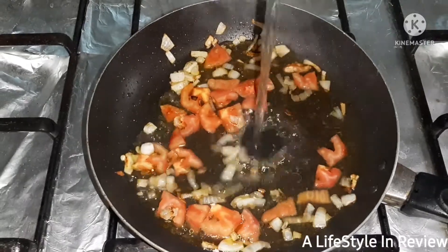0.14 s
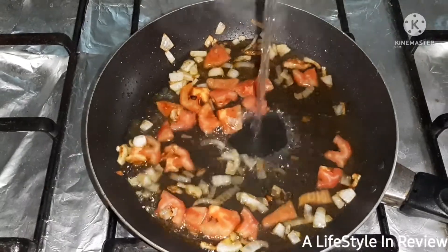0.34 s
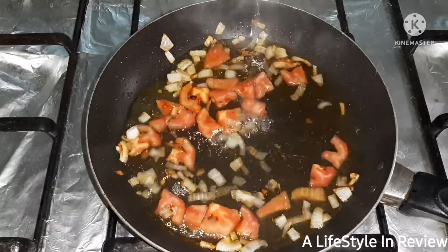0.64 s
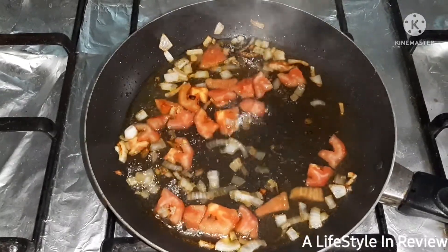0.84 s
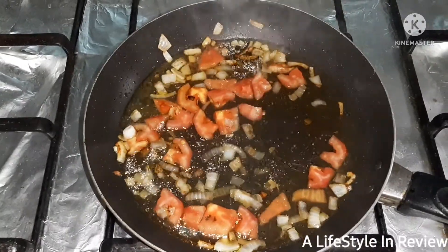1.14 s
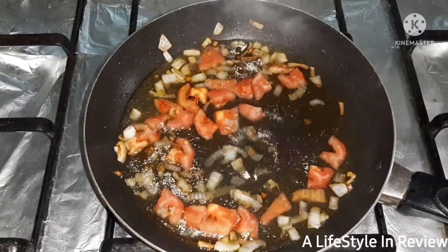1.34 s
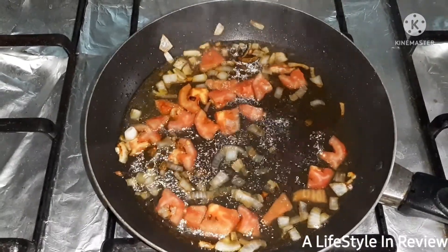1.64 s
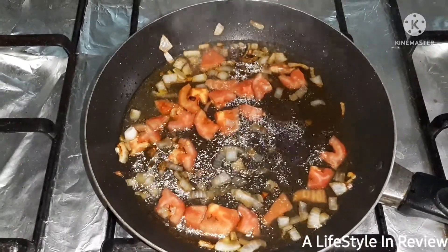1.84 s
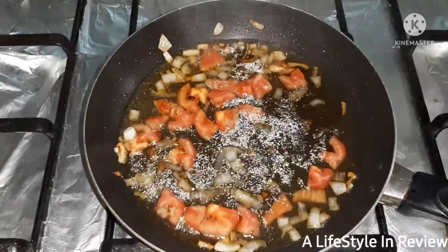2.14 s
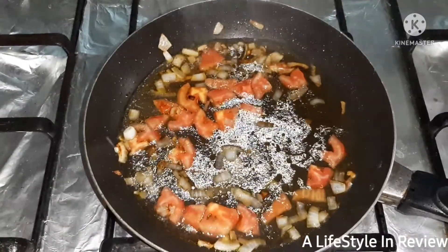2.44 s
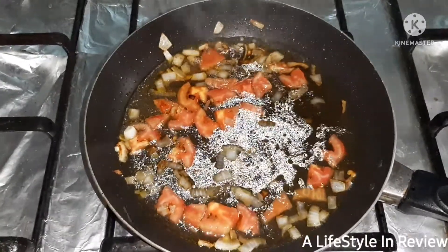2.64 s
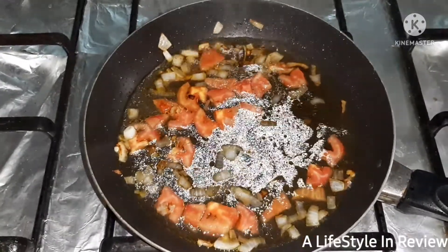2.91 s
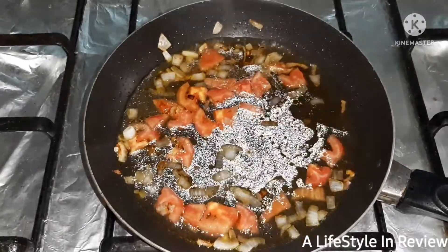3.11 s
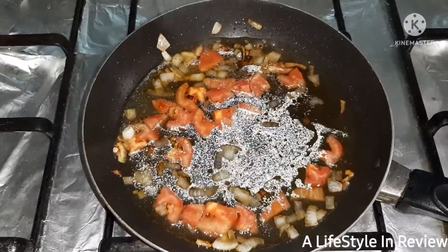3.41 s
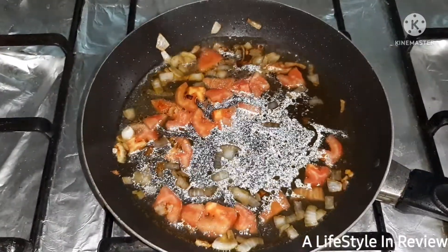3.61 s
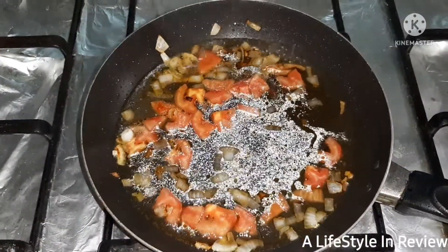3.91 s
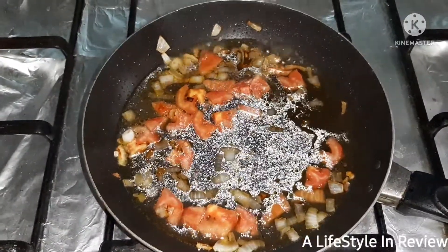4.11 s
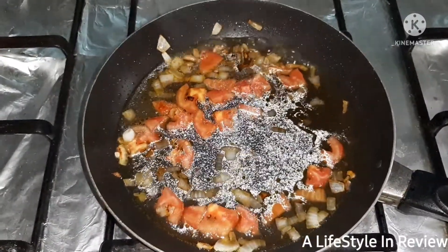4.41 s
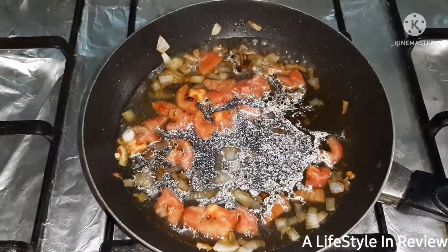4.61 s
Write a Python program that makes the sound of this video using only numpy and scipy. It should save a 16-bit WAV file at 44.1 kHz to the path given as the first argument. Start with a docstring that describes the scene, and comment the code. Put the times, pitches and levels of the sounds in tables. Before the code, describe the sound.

A hot pan of oil, onion and tomato seethes as water meets it: dense bright fizz, crackle and tiny ringing bubbles, strongest in the first second, then slowly easing. Sharp spits crowd the second half. Dull droplet taps hit the left side of a phone held close above. Near 2.8 seconds a vessel is set down with a clatter, with a softer knock after. Small hard kitchen, short echoes.

```python
"""Steam bubbles burst all over a hot frying pan as water is poured onto oil, onion and tomato.
Crowds of random clicks make the fizz and crackle, short rising tones the bubbles, bright cracks the spits.
Flying droplets tap the left microphone port of a phone held close above, as dull filtered clicks.
Something is set down with two knocks, made of fading tones and noise, in a small kitchen with short echoes."""
import sys
import numpy as np
from scipy import signal
from scipy.fft import rfft, irfft
from scipy.io import wavfile
from scipy.ndimage import uniform_filter1d

SR = 44100
rng = np.random.default_rng(int(sys.argv[2]) if len(sys.argv) > 2 else 0)


def unload_wav(signal):
    """Save mono or channel-first audio to the path in sys.argv[1] as 16-bit WAV at rate SR, clipped to [-1, 1]."""
    wavfile.write(
        sys.argv[1],
        SR,
        np.round(np.clip(np.atleast_2d(signal).T, -1, 1) * 32767).astype(np.int16),
    )


N = 209916
TIME = np.arange(N) / SR
PORT_LAG_S = .00075  # how much later the far port hears a burst at the edge of the pan
# ringing tones (modes) of the pan and its filling: (frequency [Hz], width [Hz], level [dB])
PAN_RESONANCES = [(902, 63, 1), (1130, 420, 2.5), (1492, 143, 13.5), (1743, 61, 6), (2027, 13.6, 13.5),
                  (3130, 340, 6), (3530, 130, -6.5), (4240, 360, 7)]


def undb(db):
    """Turn decibels into a gain."""
    return 10 ** (np.asarray(db) / 20)


def unit(x):
    """Scale to an average strength (rms) of 1."""
    return x / np.sqrt(np.mean(x ** 2) + 1e-18)


def fade(t, t60):
    """Die away by 60 dB in t60 seconds."""
    return np.exp(-np.log(1000) * t / t60)


def add(out, s, sound):
    """Mix a short sound in at time s."""
    i = int(np.clip(s * SR, 0, N - 1))
    out[..., i:i + sound.shape[-1]] += sound[..., :N - i]


def convolve(x, response):
    """Let every click in a sound set off a response, channel by channel."""
    return signal.oaconvolve(np.atleast_2d(x), np.atleast_2d(response), axes=1)[:, :N]


def butter(x, order, hz, kind="low"):
    """Filter a sound with a smooth low, high or band pass."""
    return signal.sosfilt(signal.butter(order, hz, kind, fs=SR, output="sos"), x)


def resonate(push, hz, width):
    """Let a push set one mode ringing; a narrow mode rings longer."""
    return signal.lfilter(*signal.iirpeak(hz, hz / width, fs=SR), push)


def swell(start, length):
    """A smooth rise from 0 to 1 and a slower fall back."""
    peak = start + 0.27 * length
    ramp = np.interp(TIME, [start, peak, start + length], [0, 1, 0])
    return np.sin(ramp * np.pi / 2) ** 2


def boil():
    """Vigour in dB against full boil: it builds as the water spreads, then sags as it boils off."""
    # changes, mostly rises, where water runs onto fresh hot metal: (start [s], length [s], change [dB])
    flares = [(0, 0.076, 1.5), (0.508, 0.31, -0.5), (0.6, 0.48, 1.5), (0.828, 0.28, 1.5),
              (1.587, 0.13, 2.5), (1.76, 0.4, 1.5), (2.042, 0.06, 0.5), (2.158, 0.072, 0.5),
              (2.493, 0.074, 1.5), (3.736, 0.094, 0.5), (3.91, 0.16, 0.5)]
    # moments, mostly lulls, where the boil catches: (start [s], length [s], change [dB])
    lulls = [(0.27, 0.087, -1.5), (.765, 0.063, -3.5), (1.123, 0.053, -3.5), (1.472, 0.084, -2.5),
             (1.976, 0.1, -2.2), (2.34, 0.084, -1.5), (2.84, 0.064, -2.5), (3.294, 0.05, -3),
             (3.803, 0.06, -1.5), (4.116, 0.04, 0.5), (4.23, 0.14, 0), (4.65, 0.067, -2)]
    full_boil_s, build_db_per_s, sag_db_per_s = 0.45, 3, 1.22
    since = TIME - full_boil_s
    trend_db = np.minimum(build_db_per_s * since, -sag_db_per_s * since)
    return trend_db + sum(db * swell(s, length) for s, length, db in flares + lulls)


def seethe(depth_db, low_hz, high_hz):
    """The whole boil wavers quickly at random, in dB."""
    return depth_db * unit(butter(rng.standard_normal(N), 2, [low_hz, high_hz], "band"))


def clicks(rate, spread_db):
    """Random clicks, rate per second on average, many small and few large."""
    size = undb(spread_db * np.minimum(rng.exponential(size=N), 4))
    happens = rng.random(N) < rate / SR
    return happens * size * np.sign(rng.standard_normal(N))


def spurts(rate, t60, steady, rise_s=0.0048):
    """Activity of one patch: it flares as water touches the metal, then dies back."""
    flares = (rng.random(N) < rate / SR) * np.minimum(rng.exponential(size=N), 3)
    dying = signal.lfilter([1], [1, -fade(1 / SR, t60)], flares)
    activity = uniform_filter1d(dying, int(rise_s * SR) + 1)  # soften each sudden start
    return unit(np.sqrt(steady + np.abs(activity)))


def burst(place, scatter=1.2, lean_db=-0.5):
    """One burst at both ports: a click, first on its own side, then echoes off the food and pan wall."""
    t = TIME[:512]
    echoes = unit(rng.standard_normal((2, len(t))) * fade(t, .005)) / np.sqrt(len(t))
    response = scatter * echoes
    response[:, 0] = 1  # the click itself
    out = np.zeros((2, 2 * len(t)))
    for port, away in enumerate((place, -place)):
        add(out[port], max(away, 0) * PORT_LAG_S, response[port] * undb(-lean_db * away))
    return out


def fizz(rate, spread_db, spurt_rate, spurt_t60, steady, scatter, count):
    """Patches across the pan, each sputtering on its own."""
    total = 0
    for place in np.linspace(-1, 1, count):
        sputter = clicks(rate / count, spread_db) * spurts(spurt_rate, spurt_t60, steady)
        total = total + convolve(sputter, burst(place, scatter))
    return unit(total)


def bubble_ring(t, hz, t60, glide):
    """A bubble rings briefly, rising in pitch as it opens."""
    return np.sin(2 * np.pi * hz * t * (1 + glide * t / t60)) * fade(t, t60)


def bubbles(centre_hz, octaves, cycles, spread_db, count, glide=0.093, lean_db=4.5):
    """Bubbles of many sizes ring all over the pan, each earlier and louder at the nearer port."""
    t = TIME[:int(2 * SR * cycles / centre_hz) + 100]
    when, place, pitch, size, life = rng.random((count, 5)).T[..., None]
    # pitches crowd around the centre
    hz = np.clip(centre_hz * 2 ** (octaves * np.log(pitch / (1 - pitch)) / 2), 900, 15000)
    t60 = cycles * (.5 + life) / hz
    ring = bubble_ring(t, hz, t60, glide) * undb(-spread_db * np.log(size + 0.03))
    ports = []
    for away in (place - .5, .5 - place):
        start = np.abs(when * N + away * PORT_LAG_S * SR).astype(int)
        samples = (start + np.arange(len(t))).ravel()
        heard = ring * undb(-2 * lean_db * away)
        ports.append(np.bincount(samples, heard.ravel(), N)[:N])  # add up all the rings
    return unit(np.array(ports))


def snaps():
    """Skins of oil snap open: ticks of a few cycles, each with its own pitch; low ones more alike in size."""
    low = bubbles(centre_hz=2900, octaves=0.55, cycles=4, spread_db=2.1, count=2200)
    high = bubbles(centre_hz=5600, octaves=0.38, cycles=6, spread_db=4.2, count=1700)
    return unit(undb(-1) * low + high)


def pan_shimmer(rate=1300, spread_db=1.5, detune=0.015, uneven_db=3.0, count=6):
    """Bubbles collapse on the metal: each spot rings its own mix of modes, tuned by the liquid over it."""
    out = 0
    for spot in np.linspace(-1, 1, count):
        push = unit(clicks(rate / count, spread_db) * spurts(rate=51, t60=0.014, steady=0.28))
        for k, (hz, width, db) in enumerate(PAN_RESONANCES):
            shape_db = uneven_db * np.cos(np.pi * (k + 2) * spot / 2 + k)
            tuned = 1 + detune * spot
            ring = signal.lfilter(*signal.iirpeak(hz * tuned, hz / width, fs=SR), push)
            out = out + undb(db + shape_db) * ring
    return out / np.sqrt(count)


def coarsen(x, db, low_hz=600, high_hz=5500):
    """Bigger bubbles put more of their sound into the middle range."""
    band = signal.butter(2, [low_hz, high_hz], "band", fs=SR, output="sos")
    middle = signal.sosfiltfilt(band, x)
    return x + (undb(db) - 1) * middle


def pan_colour(x, size=1024):
    """The pan and ports colour each side's sound; the filter only acts after each sound, never before."""
    # tone colour of the frying at the two ports: (frequency [Hz], left level [dB], right level [dB])
    colour = np.array([(30, -14, -31), (102, -12, -14), (420, -10.5, -14.5), (815, -8.5, -10),
                       (900, -6, -5), (1960, 1.5, -4), (2580, -1.5, 1), (3450, 2.5, -1.5), (4480, -5, -3),
                       (7360, 0.5, 0), (7870, 5, 0.5), (8800, -2.5, -6.5), (11120, 6.5, 5.5),
                       (13400, 3.5, 8), (15300, 7.5, 11.5)])
    hz = np.fft.rfftfreq(size, 1 / SR) + 1
    responses = []
    for port in range(2):
        db = np.interp(np.log(hz), np.log(colour[:, 0]), colour[:, 1 + port])
        # fold the cepstrum (spectrum of the log spectrum) onto positive time
        cepstrum = irfft(np.log(undb(db)))
        cepstrum[1:size // 2] *= 2
        cepstrum[size // 2 + 1:] = 0
        responses.append(irfft(np.exp(rfft(cepstrum))))
    return convolve(x, responses)


def frying(vigour_db):
    """Fizz, crackle and bubbles surge together; as the water boils off, the sound grows coarser."""
    age = TIME - TIME.mean()  # seconds from the middle of the scene
    fine = fizz(rate=20000, spread_db=2.4, spurt_rate=60, spurt_t60=.02, steady=.2, scatter=.1, count=14)
    crackle = fizz(rate=1300, spread_db=0.5, spurt_rate=60, spurt_t60=0.025, steady=0.28,
                   scatter=0.46, count=12)
    crackle = undb(-8) * crackle + undb(-6) * snaps()
    crackle = crackle * undb(0.2 * age)  # grows by 0.2 dB per second as the pan dries
    large = bubbles(centre_hz=2586, octaves=0.694, cycles=76, spread_db=1.0, count=1200)
    small = bubbles(centre_hz=6990, octaves=0.7, cycles=38, spread_db=1.0, count=4200)
    bursts = undb(-4) * fine + crackle + undb(-12) * large + undb(-7) * small + undb(-3) * pan_shimmer()
    # the pour breaks up into gulps as it ends: one swell that coarsens the boil
    gulps_db = 2.1 * swell(0.48, 0.27)
    coarse_db, coarse_db_per_s = -1.26, 0.7
    bursts = coarsen(bursts, coarse_db + coarse_db_per_s * age + gulps_db)
    full_boil_db = -23.0  # before the pan colour
    boil_db = full_boil_db + vigour_db + seethe(depth_db=0.77, low_hz=5.3, high_hz=28.6)
    cracks = spits(db=-16.5)
    ringing = undb(-3.5) * pan_ring(cracks.mean(axis=0))
    return pan_colour(undb(boil_db) * bursts + cracks + ringing)


def tap(high_hz, low_hz=55):
    """One droplet on the phone: a dull push with a peak of 1."""
    click = 1. * (TIME[:2048] == 0)
    push = butter(click, 1, [low_hz, high_hz], "band")
    push = butter(push, 2, [35, 2400], "band")
    return push / np.abs(push).max()


def droplets(vigour_db):
    """Dull taps by the left port that the other port hardly hears; a harder boil makes the spray louder."""
    # larger droplets: (time [s], level before a shared gain [dB], brightness [Hz])
    landings = [(.037, -24, 600), (0.1692, -22, 900), (.244, -22, 500), (0.353, -14.5, 900),
                (.399, -20.5, 600), (.436, -21.5, 600), (0.646, -18, 700), (0.672, -19.5, 500),
                (0.751, -17, 700), (0.7689, -17, 600), (0.964, -14.5, 700), (1.0002, -11, 1400),
                (1.099, -14, 1600), (1.1086, -14.5, 600), (1.142, -15, 1200), (1.179, -17, 600),
                (1.241, -8.5, 1600), (1.27, -17, 700), (1.514, -6, 1250), (1.566, -17, 550),
                (1.5825, -16, 600), (1.65, -16, 700), (1.689, -13.5, 900), (1.899, -19, 700),
                (2.2585, -12.5, 900), (2.642, -18, 600), (2.675, -15.5, 700), (2.739, -20, 600),
                (2.994, -24, 500), (3.097, -21, 600), (3.245, -18, 700), (3.3743, -21, 800),
                (3.749, -20, 900), (3.951, -27, 500), (4.019, -22, 500), (4.125, -23, 900),
                (4.403, -20, 700), (4.611, -18, 710)]
    tap_db, right_db = 1.0, -30
    spray_db, spray_per_db = -40, 1.14  # level at full boil, dB of spray per dB of vigour
    patter = clicks(rate=230, spread_db=1.05) * spurts(rate=50, t60=0.03, steady=.6)
    # the spray stops reaching the phone at 4.57 s, falling by 90 dB per second
    ebb_db = 90 * np.maximum(TIME - 4.57, 0)
    spray = unit(convolve(patter, tap(700))[0])
    out = spray * undb(spray_db + spray_per_db * vigour_db - ebb_db)
    for s, db, bright_hz in landings:
        add(out, s, -tap(bright_hz) * undb(db + tap_db))
    return np.array([out, out * undb(right_db)])


def spits(db, rattle=0.24, rattle_t60=0.014, body_db=3.0):
    """A trapped drop explodes: a compact crack with a full middle range, and a brief rush of steam."""
    # sharp spits of oil: (time [s], level before a shared gain [dB], place [-1 left to 1 right edge])
    explosions = [(0.12, 10.5, -0.38), (0.232, 1, -0.2), (0.243, 11, -0.18), (0.556, -2, 0.68),
                  (0.571, 10, 0.46), (0.853, 2, -0.24), (.9335, 5, -0.65), (1.6495, 1, -0.1),
                  (2.303, 6, -0.65), (2.675, 10, -0.27), (2.7367, 12, 0.016), (2.826, 6, 0),
                  (2.951, 8.5, -0.2), (3.0978, 7, -0.35), (3.1694, 13, -0.16), (3.244, -1, 0),
                  (3.247, 9.5, -0.09), (3.4577, 9.5, -0.16), (3.747, 7, -0.66), (3.751, 9, -0.2),
                  (3.8443, 8.5, -1.2), (3.9355, 13.5, -0.87), (3.987, 8, 0), (4.1245, 5.5, -0.6),
                  (4.3455, 8.5, -0.2), (4.4027, 7, 0.17), (4.451, 6.5, -0.62), (4.462, 2, -0.61),
                  (4.563, 9.5, -0.083)]
    out, t = np.zeros((2, N)), TIME[:1024]
    for s, size_db, place in explosions:
        steam = rattle * rng.standard_normal((2, len(t))) * fade(t, rattle_t60)
        add(out, s, undb(db + size_db) * (burst(place, scatter=0.88) + steam))
    return coarsen(out, body_db)


def pan_ring(push):
    """The pan rings as one body and reaches both ports together."""
    return sum(undb(db) * resonate(push, hz, width) for hz, width, db in PAN_RESONANCES)


def plops(db=5, t60=0.023, glide=0.019, lag_s=0.00026):
    """The largest bubbles ring on their own, with a small random delay at each port."""
    # single bubbles that stand out: (time [s], level before a shared gain [dB], starting pitch [Hz])
    big_bubbles = [(0.167, -26, 3460), (.229, -28, 3600), (.729, -20.5, 1580), (0.732, -22, 3000),
                   (.891, -38, 1440), (0.918, -23, 3180), (1.187, -22.5, 1530), (2.504, -23, 3210),
                   (2.782, -22, 1990), (3.389, -23, 1470), (3.706, -28, 3450), (3.72, -28.5, 1110),
                   (3.983, -26, 3400), (3.987, -31, 3330), (4.3456, -24, 3450), (4.59, -28.5, 1010),
                   (4.752, -23, 1490)]
    out, t = np.zeros((2, N)), TIME[:1024]
    for s, size_db, hz in big_bubbles:
        for port, lag in enumerate(lag_s * rng.random(2)):
            add(out[port], s + lag, undb(db + size_db) * bubble_ring(t, hz, t60, glide))
    return out


def knocks(clatter_share=0.63, clatter_t60=0.19):
    """A vessel meets the worktop: a short clatter, and its modes ring."""
    # touches that make up the knocks: (time [s], level [dB], brightness of the contact [Hz])
    contacts = [(2.806, -17.5, 3800), (2.8124, -18.5, 2200), (2.827, -26, 1700), (2.841, -33, 1500),
                (3.109, -25, 900)]
    # what vessel and worktop ring with: (frequency [Hz], relative level [dB], time to fade by 60 dB [s])
    modes = [(131, -23, 0.6), (266, -30, 0.096), (522, -4, 0.058), (933, 1, 0.057), (1512, -5, 0.069),
             (2200, 4, 0.029), (2280, 4, 0.055), (2420, -2, 0.035), (3100, -5, .06)]
    out, t = np.zeros((2, N)), TIME[:SR // 3]
    for s, db, bright_hz in contacts:
        ring = 0
        for hz, mode_db, t60 in modes:
            tone = np.sin(2 * np.pi * (hz * t + rng.random((2, 1))))
            ring = ring + undb(mode_db) * fade(t, t60) * tone
        clatter = clatter_share * rng.standard_normal((2, len(t))) * fade(t, clatter_t60)
        add(out, s, undb(db) * butter(ring / 2 + clatter, 2, bright_hz))
    return out


def kitchen(x, wet_db, t60=0.11, count=6):
    """Hard walls close by return a short blurred tail; sounds from changing places get different echoes."""
    t = TIME[:SR // 5]
    hold = SR // 40  # samples before the next random place
    place = np.repeat(rng.integers(count, size=N // hold + 1), hold)[:N]
    wet = 0
    for k in range(count):
        tail = rng.standard_normal((2, len(t))) * fade(t, t60) * (t > .004)
        share = np.sqrt(np.abs(uniform_filter1d(1. * (place == k), hold // 2)))  # blend between places
        wet = wet + convolve(x * share, unit(tail) / np.sqrt(len(t)))
    return x + undb(wet_db) * wet


def scene():
    """The pan has weaker echoes than the knocks; the droplets touch the phone itself and have none."""
    vigour_db = boil()
    pan = kitchen(frying(vigour_db) + plops(), wet_db=-4.0)
    set_down = kitchen(knocks(), wet_db=-2.5, count=2)
    return pan + set_down + droplets(vigour_db)


def record(dry):
    """The phone drops the deepest bass and cuts the top steeply."""
    dry = butter(dry, 3, 42, "high")
    top_cut = signal.ellip(12, .2, 75, 15480, fs=SR, output="sos")  # cuts above 15480 Hz
    return signal.sosfilt(top_cut, dry)


dry = scene()
out = record(dry)
unload_wav(out)
```